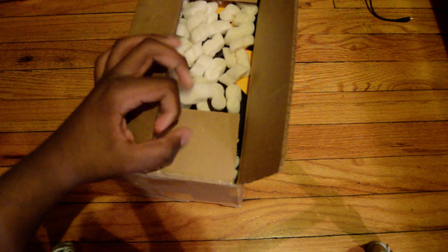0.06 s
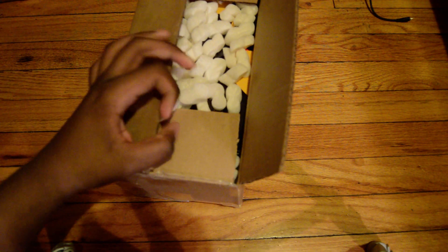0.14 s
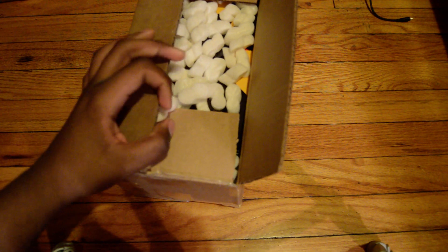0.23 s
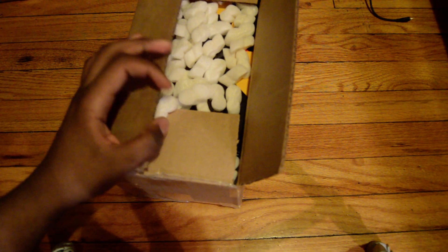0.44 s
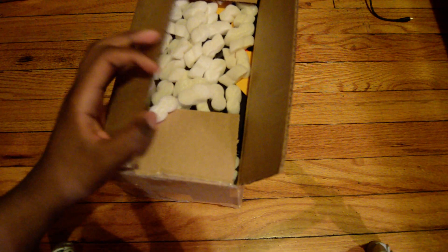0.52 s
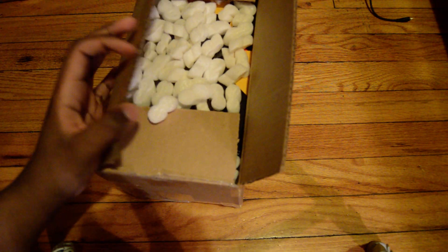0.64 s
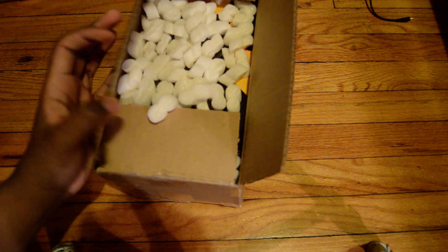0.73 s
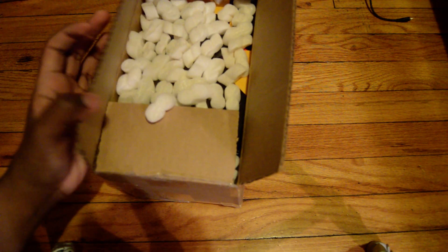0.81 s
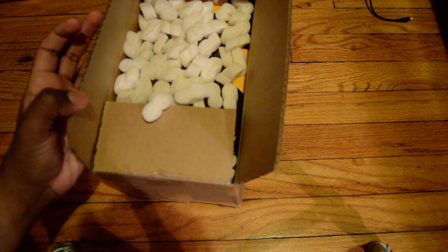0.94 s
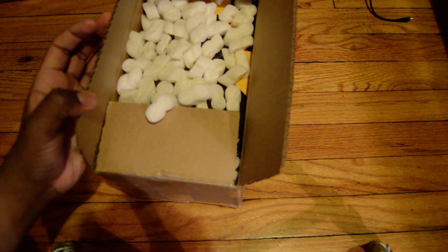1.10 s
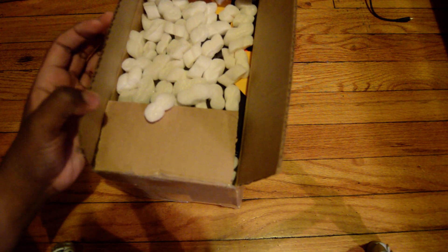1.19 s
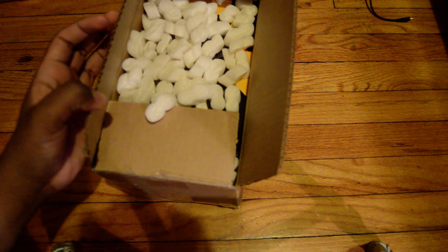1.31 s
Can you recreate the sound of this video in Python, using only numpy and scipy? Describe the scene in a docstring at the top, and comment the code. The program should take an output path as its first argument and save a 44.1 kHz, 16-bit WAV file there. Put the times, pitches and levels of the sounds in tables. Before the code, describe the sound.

A cardboard box is shoved across a wooden floor, giving a quick cluster of hollow knocks, a crunch of foam peanuts and a short scrape. Fingers then brush the flap with dry rustles and ticks, close by in a small room.

```python
"""Shoving a box of packing peanuts

A hand shoves an open cardboard box of foam peanuts across a wooden floor in a small room.
The box knocks, judders and scrapes to a stop; each jolt booms in its cavity, slaps its walls and
crunches the peanuts. Then the fingers brush along the flap, with dry rustles, small ticks,
faint squeaks and a soft bump."""
import sys
import numpy as np
from scipy import signal
from scipy.fft import rfft, irfft, next_fast_len
from scipy.io import wavfile
from scipy.ndimage import map_coordinates

SR = 44100
rng = np.random.default_rng(int(sys.argv[2]) if len(sys.argv) > 2 else 0)


def put_to_file(sound):
    """Save the sound as 16-bit audio at rate SR, in the file named by the first command-line argument."""
    columns = np.atleast_2d(sound).T  # one column per channel
    safe = np.clip(columns, -1, 1)
    whole_steps = np.round(safe * 32767)
    wavfile.write(sys.argv[1], SR, whole_steps.astype(np.int16))


N = 59535


# Jolts of the shoved box: start_s, boom_db, slap_db, crunch_db
JOLT_HITS = [(0.2245, -19.5, -12, -18.5), (.2379, -9.5, -11, -15), (0.2475, -13, -5, -12.5),
             (0.2531, -16.5, -20, -8), (0.2602, -39, -19, -11), (0.283, -20, -11.5, -22),
             (0.3017, -42, -18.5, -28), (0.3308, -15, -13.5, -16), (0.3488, -25, -20, -18),
             (0.3774, -23.5, -30, -38), (0.4064, -17, -27, -31), (0.4427, -22.5, -52, -66),
             (0.4657, -22.5, -50, -58), (.4779, -25, -45, -63)]
# Modes of the box and the air in it: pitch_hz, gain_db, t60_s
CAVITY_MODES = [(199, -16.5, 0.066), (272.3, -10.5, 0.11), (325.2, -5, 0.095), (307, -12, 0.26),
                (392, -7.5, 0.063), (444, -11, 0.09)]
# Soft low bumps: start_s, pitch_hz, level_db; the one at 0.225 s is the low thud of the box's first jolt, the
# rest come from the hand
LOW_BUMPS = [(0.144, 150, -37.5), (0.225, 193, -23), (0.594, 187, -40), (0.701, 278, -38.5),
             (0.77, 255, -38.5), (.783, 390, -36), (0.822, 352, -43.5), (0.998, 465, -42),
             (1.2261, 137, -30.5), (1.227, 237, -40.5)]

def booms(bump_t60_s=0.05, low_cut_hz=148):
    """The hollow low voice of the box, jolted or bumped; it is too small to radiate deep bass."""
    jolts = ringing([(s, db) for s, db, _, _ in JOLT_HITS], CAVITY_MODES)
    bumps = sum(ringing([(s, db)], [(hz, 0, bump_t60_s)]) for s, hz, db in LOW_BUMPS)
    return highpass(jolts + bumps, low_cut_hz, order=3)


# Light finger taps on the flap: start_s, level_db
FLAP_TAPS = [(0.0855, -31.5), (0.5121, -25), (0.622, -33.5), (0.74, -27), (0.746, -32.5), (0.781, -57),
             (0.997, -33)]
# Tone of struck cardboard: freq_hz, gain_db
SLAP_EQ = [(30, -44), (90, -30), (170, -2), (450, -0.5), (800, -4), (1100, 0), (1450, -1), (2050, 1),
           (2350, -3), (3100, -7), (4200, -10), (9000, -27.5)]

def wall_slaps():
    """Jolts and taps slap the cardboard: snappy noise bursts coloured by the walls."""
    hits = [(s, db) for s, _, db, _ in JOLT_HITS] + FLAP_TAPS
    envelope = bursts(hits, attack_s=0.00014, t60_s=0.035)
    return colour(envelope * rng.standard_normal(N), SLAP_EQ, WALL_MODES)


# Modes of the box's stiff edge: pitch_hz, gain_db, t60_s
EDGE_MODES = [(1143, -11, 0.019), (1486, -3, 0.021), (1840, -5, 0.03), (2089, -1, 0.028), (3060, -7.5, .02)]
CRACK_HIT = (0.2474, -5.5)  # start_s, level_db

def edge_crack():
    """The hardest knock cracks the stiff edge, which rings hard and dies fast."""
    return ringing([CRACK_HIT], EDGE_MODES, attack_s=0.00074)


# Modes of the cardboard walls: pitch_hz, width_hz, gain_db
WALL_MODES = [(636, 28, -4.5), (742, 26, -1), (950, 29, -9.5), (1093.4, 16, 3), (1258, 34, -1),
              (1390, 77, -16), (1483, 28, -2.5), (1877, 15, -2), (2050, 46, -14), (2113, 15, -3),
              (2536, 26, 0), (3110, 66, -5.5)]

def wall_tones(trim_db=-22.5):
    """Jolts and the crack ring the walls; the narrower a mode, the longer it lasts."""
    modes = [(hz, db + trim_db, np.log(1000) / (np.pi * width)) for hz, width, db in WALL_MODES]
    return ringing([(s, db) for s, _, db, _ in JOLT_HITS] + [CRACK_HIT], modes)


# Envelope of the slide: time_s, level_db
SCRAPE_ENVELOPE = [(.225, -73), (.262, -23.5), (.30, -65), (.325, -31), (.36, -29.5), (.42, -28),
                   (.455, -36.5), (.482, -45), (.50, -75), (.56, -66)]
# Tone of cardboard on wood: freq_hz, gain_db
SCRAPE_EQ = [(60, -49), (200, -5), (420, -14), (650, -7), (1200, -2.5), (1900, -8.5), (2700, -40),
             (4500, -28), (12000, -43)]

def floor_scrape():
    """The box drags over the floor in tiny slips that resonate in its walls."""
    return colour(level(SCRAPE_ENVELOPE) * grains(spread_db=6.5), SCRAPE_EQ, WALL_MODES)


# Crisp tone of the foam: freq_hz, gain_db
CRUNCH_EQ = [(300, -20), (2000, -8), (4000, -6), (6500, -5), (9000, -6.5), (10000, 2), (11000, -3),
             (11900, 3.5), (12500, -9), (14000, -11.5), (15600, -23)]

def peanut_crunch():
    """Each jolt makes the foam pieces grind briefly against each other."""
    envelope = bursts([(s, db) for s, _, _, db in JOLT_HITS], attack_s=0.00022, t60_s=0.058)
    return colour(envelope * grains(spread_db=4.5), CRUNCH_EQ)


# Envelope of the rubbing fingers: time_s, level_db
RUB_ENVELOPE = [(0, -43), (.025, -39.5), (.07, -45), (.11, -45.5), (.138, -35), (.16, -54), (.21, -49.5),
                (.495, -48), (.52, -37.5), (.575, -42), (.65, -44), (.715, -40.5), (.745, -31),
                (.765, -36.5), (.805, -32), (.90, -41.5), (.935, -36), (.95, -28), (.98, -31), (1.003, -24),
                (1.018, -33.5), (1.052, -32), (1.075, -44.5), (1.10, -37.5), (1.135, -44.5), (1.195, -41),
                (1.22, -35.5), (1.255, -38.5), (1.275, -33), (1.295, -27.5), (1.32, -34), (1.35, -39.5)]
# Dry tone of skin on cardboard: freq_hz, gain_db
RUSTLE_EQ = [(200, -18.5), (1200, -17.5), (2200, -8), (3400, -3.5), (4600, -1), (6500, -2), (8500, 1),
             (10200, 3.5), (11500, -1), (13000, -9), (15600, -18)]

def finger_rustle(knots_per_s=250):
    """Skin catches and slips on the flap: a grainy rustle whose level flickers."""
    knots = rng.standard_normal(2 * knots_per_s)
    catch = map_coordinates(knots, [np.arange(N) * knots_per_s / SR])  # smooth random curve
    rub = level(RUB_ENVELOPE) * amp(1.04 * catch + 0.5) * grains(spread_db=4.5)
    return colour(rub, RUSTLE_EQ)


# Dry ticks and snaps, from the fingers on the flap and, thin and high, from the foam: start_s, level_db, t60_s,
# low_cut_hz
DRY_TICKS = [(0.0753, -24.5, 0.007, 1200), (0.132, -30.5, 0.047, 1490), (0.148, -26.5, 0.015, 1490),
             (0.5039, -26.5, 0.048, 1200), (0.5115, -12.5, 0.014, 990), (0.609, -26.5, 0.018, 4000),
             (0.627, -25, 0.0099, 2500), (0.678, -30.5, 0.019, 4100), (0.697, -17, 0.0045, 6030),
             (0.745, -24, 0.013, 4040), (0.8629, -15.5, 0.006, 6040), (0.8978, -24, 0.0073, 4960),
             (.922, -22.5, 0.013, 3960), (0.996, -19, 0.047, 2020), (1.057, -18, 0.0077, 2000),
             (1.064, -19.5, 0.016, 2000), (1.0861, -22.5, 0.033, 1940), (1.202, -28, .025, 2950),
             (1.2873, -19.5, 0.063, 2590)]
# Their bright tone: freq_hz, gain_db
TICK_EQ = [(300, -30), (1500, -4.5), (4000, -3), (6500, 1.5), (8500, -1), (10500, 2), (12500, -4),
           (15600, -21)]

def dry_ticks(attack_s=0.00025):
    """Sharp, dry ticks: the fingers catch on the flap, some fuller, some thin; the thinnest and highest come
    from the foam pieces."""
    ticks = np.zeros(N)
    for s, db, t60_s, low_cut_hz in DRY_TICKS:
        thin_noise = highpass(rng.standard_normal(N), low_cut_hz, order=2)
        ticks += bursts([(s, db)], attack_s, t60_s) * thin_noise
    return colour(ticks, TICK_EQ)


# Faint squeaks of the rubbing: start_s, length_s, mid_pitch_hz, half_width_hz, level_db
RUB_SQUEAKS = [(0.989, 0.031, 4580, 300, -31), (1.136, 0.063, 1880, 220, -46),
               (1.139, 0.064, 6430, 200, -44.5), (1.19, 0.09, 2143, 336, -44),
               (1.209, .055, 4620, 128, -39.5), (1.27, 0.096, 4550, 302, -54),
               (1.272, 0.052, 1864, 298, -42.5)]

def finger_squeaks(sag_hz_per_s=5100):
    """Brief stick-slip whistles, rough and sagging in pitch."""
    out = np.zeros(N)
    for s, length, hz, half_width_hz, db in RUB_SQUEAKS:
        t = np.arange(N) / SR - s - length / 2  # zero at mid-squeak
        lowpass = signal.butter(2, half_width_hz, fs=SR, output="sos")
        waver = signal.sosfilt(lowpass, rng.standard_normal((2, N)))
        phase = 2 * np.pi * (hz * t - sag_hz_per_s * t ** 2 / 2)
        tone = unit(waver[0] * np.sin(phase) + waver[1] * np.cos(phase))
        swell = np.cos(np.pi * np.clip(t / length, -.5, .5))
        out += amp(db) * swell * tone
    return out


# Envelope of the box's murmur: time_s, level_db
MURMUR_ENVELOPE = [(0, -46.5), (.03, -46.5), (.11, -55), (.14, -39.5), (.19, -74), (.48, -47.5), (.56, -44),
                   (.66, -50), (.79, -41.5), (.88, -53.5), (1.10, -61), (1.17, -49.5), (1.30, -49),
                   (1.35, -63)]
# Its dull tone: freq_hz, gain_db
MURMUR_EQ = [(60, -13), (150, -1), (310, 3), (600, -3.5), (950, -0.5), (1400, 5.5), (2200, -11.5),
             (3200, -22), (8000, -21)]

def box_murmur():
    """The walls murmur quietly under the hand."""
    return colour(level(MURMUR_ENVELOPE) * grains(spread_db=6.0), MURMUR_EQ, WALL_MODES)


# Decay of the small room: freq_hz, t60_s
ROOM_DECAY = [(150, 0.77), (400, 0.68), (1500, 0.28), (2300, 0.38), (4000, 0.4), (10000, 0.24),
              (15000, 0.1)]

def room_reverb(send, build_s=0.0035):
    """The room's tail; each frequency dies at its own speed."""
    hz, t, noise = signal.stft(rng.standard_normal(SR * 3 // 4), SR, nperseg=256)
    decay = amp(-60 * t / along(ROOM_DECAY, hz)[:, None])
    tail = signal.istft(noise * decay, SR, nperseg=256)[1]
    tail *= 1 - np.exp(-np.arange(len(tail)) / SR / build_s)
    return signal.fftconvolve(send, tail / np.linalg.norm(tail))[:N]


# Tone of the background: freq_hz, gain_db
ROOM_TONE_EQ = [(20, -6), (60, 4), (90, 1), (140, 6.5), (300, -20.5), (1000, -6), (4000, -7.5),
                (15000, -39)]

def room_tone(level_db=-50):
    """A quiet, steady bed of rumble and hiss."""
    return amp(level_db) * colour(rng.standard_normal(N), ROOM_TONE_EQ)


def ringing(hits, modes, attack_s=0.0018):
    """Damped modes (pitch_hz, gain_db, t60_s) struck by hits (start_s, level_db)."""
    out = np.zeros(N)
    for s, db in hits:
        first = int(s * SR) + 1
        t = np.arange(first, min(N, first + SR // 2)) / SR - s
        ring = sum(amp(db + g - 60 * t / t60) * np.sin(2 * np.pi * hz * t) for hz, g, t60 in modes)
        out[first:first + len(t)] += 2 * ring * (1 - np.exp(-t / attack_s))
    return out


def bursts(hits, attack_s, t60_s):
    """Envelope of hits (start_s, level_db) that rise fast and die away."""
    power = np.zeros(N)
    for s, db in hits:
        t = np.maximum(np.arange(N) / SR - s, 0)
        power += (amp(db - 60 * t / t60_s) * (1 - np.exp(-t / attack_s))) ** 2
    return np.sqrt(power)


def grains(spread_db, per_s=9000):
    """Dense tiny slips of uneven size, rms 1."""
    slips = (rng.random(N) < per_s / SR) * rng.choice([-1, 1], N)
    return unit(slips * amp(spread_db * np.clip(rng.standard_normal(N), -2, 2)))


def colour(x, eq, modes=(), mode_trim_db=-3, size=16384):
    """Causal EQ of unit energy; any modes stand out of it as resonant peaks."""
    f = np.fft.rfftfreq(size, 1 / SR)
    peaks = sum(amp(db + mode_trim_db) / (1 + (2 * (f - hz) / width) ** 2) for hz, width, db in modes)
    gain = amp(along(eq, f)) * (1 + peaks)
    cepstrum = irfft(np.log(gain))
    cepstrum[1:size // 2] *= 2  # fold to minimum phase, so attacks stay sharp
    cepstrum[size // 2:] = 0
    impulse = irfft(np.exp(rfft(cepstrum)))
    return signal.fftconvolve(x, impulse / np.linalg.norm(impulse))[:N]


def highpass(x, hz, order):
    """Roll off the lows."""
    return signal.sosfilt(signal.butter(order, hz, "high", fs=SR, output="sos"), x)


def level(points):
    """Breakpoints (time_s, level_db) as a gain per sample."""
    return amp(np.interp(np.arange(N) / SR, *np.transpose(points)))


def along(points, hz):
    """Read a curve (freq_hz, value) on a log frequency axis."""
    freqs, values = np.transpose(points)
    return np.interp(np.log(hz + 1), np.log(freqs + 1), values)


def amp(db):
    """Decibels to gain."""
    return 10 ** (np.asarray(db) / 20)


def unit(x):
    """Scale to rms 1."""
    return x / np.sqrt(np.mean(x ** 2) + 1e-20)


def scene():
    """Box, peanuts and hand in mono over the room tone; the booms get the least reverb."""
    low = booms()
    box = wall_slaps() + edge_crack() + wall_tones() + floor_scrape() + box_murmur() + peanut_crunch()
    hand = finger_rustle() + dry_ticks() + finger_squeaks()
    reverb = room_reverb(amp(-10) * (box + hand) + amp(-19) * low)
    return (low + box + hand + reverb + room_tone())[None]


def record(dry):
    """Clip the loudest knock, then trim the deepest bass and the very top."""
    low_cut_hz, top_hz = 70, 15700
    clipped = highpass(np.clip(dry, -1, 1), low_cut_hz, order=1)
    size = next_fast_len(N + SR // 4)
    passband = np.fft.rfftfreq(size, 1 / SR) < top_hz
    return irfft(rfft(clipped, size) * passband, size)[:, :N]


dry = scene()
out = record(dry)
put_to_file(out)
```